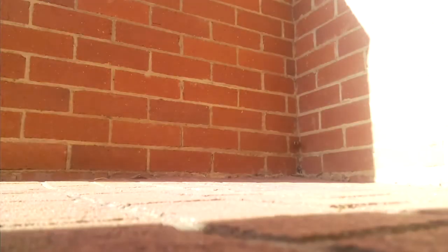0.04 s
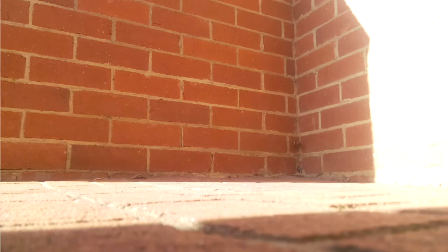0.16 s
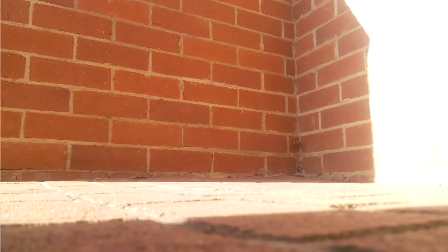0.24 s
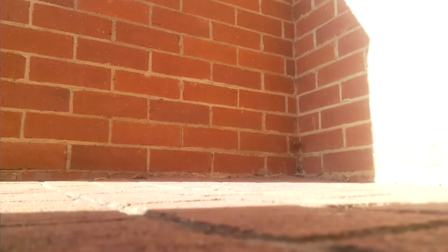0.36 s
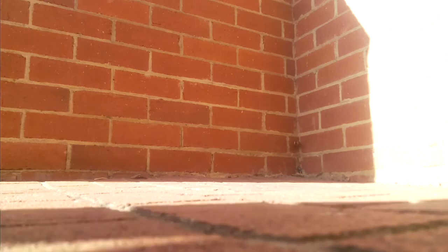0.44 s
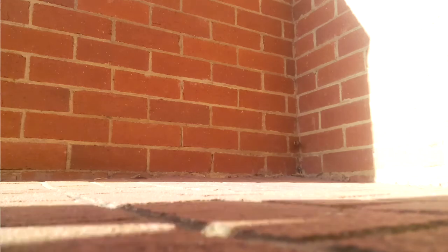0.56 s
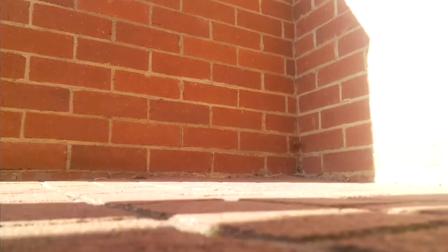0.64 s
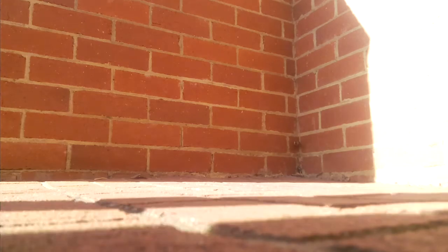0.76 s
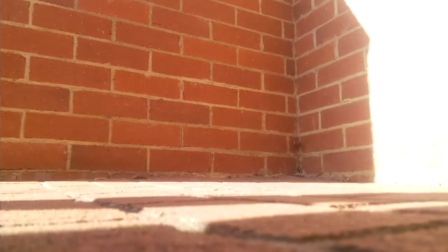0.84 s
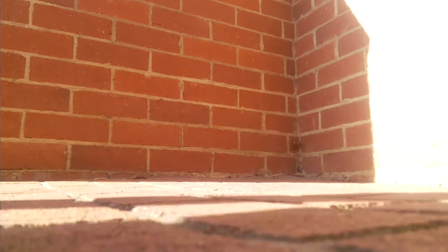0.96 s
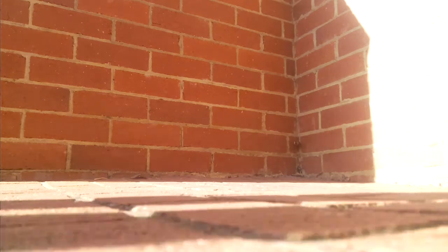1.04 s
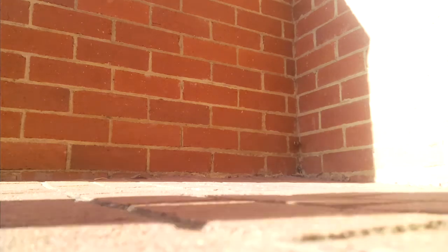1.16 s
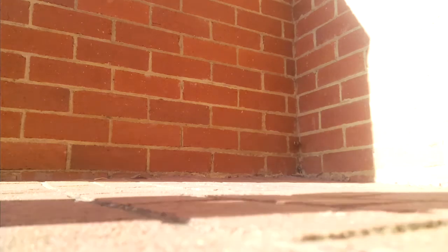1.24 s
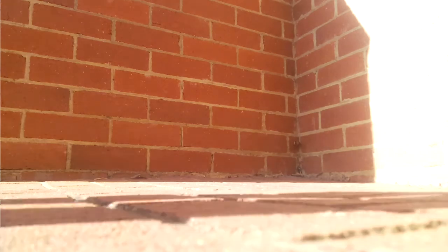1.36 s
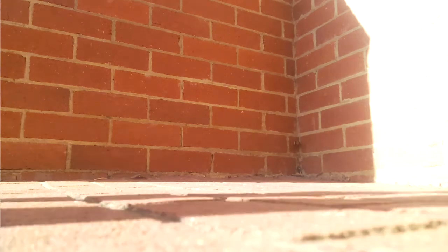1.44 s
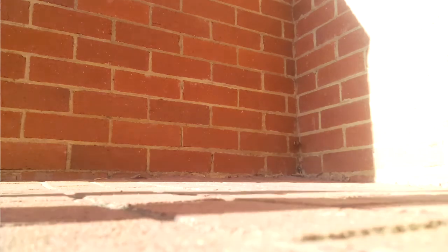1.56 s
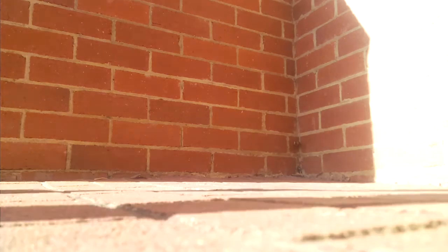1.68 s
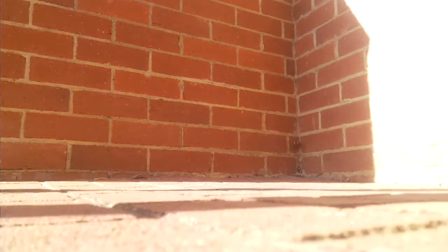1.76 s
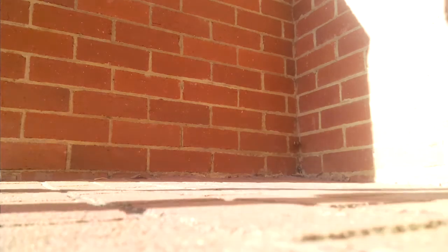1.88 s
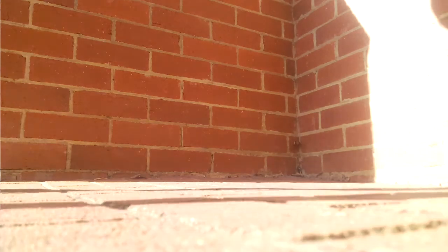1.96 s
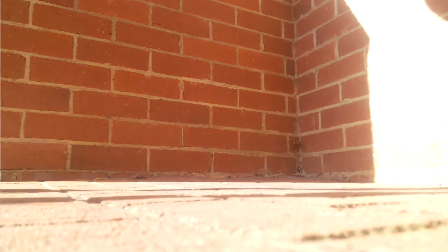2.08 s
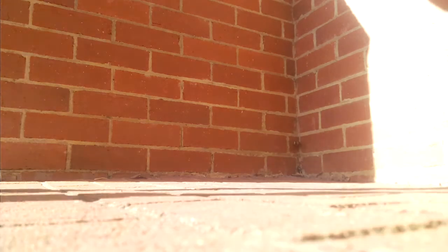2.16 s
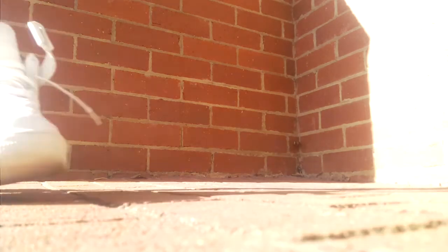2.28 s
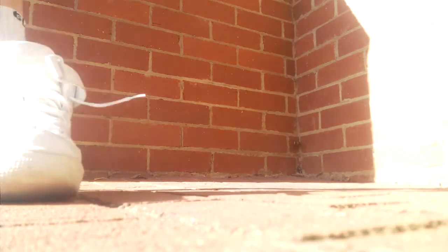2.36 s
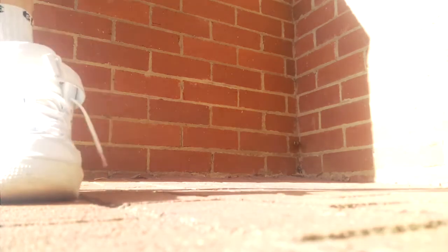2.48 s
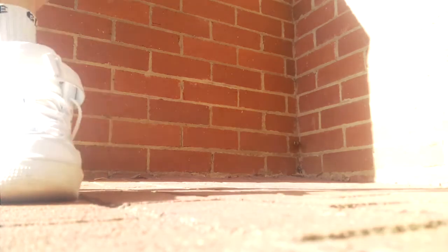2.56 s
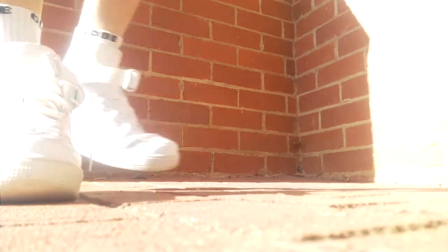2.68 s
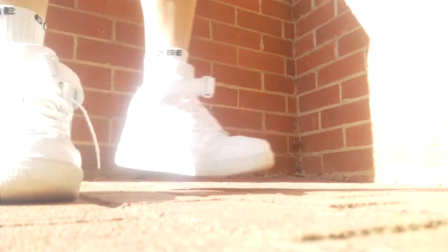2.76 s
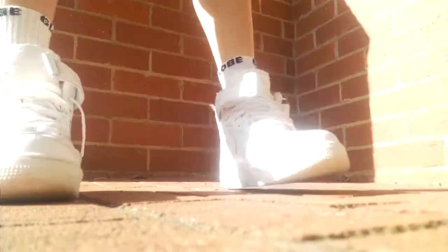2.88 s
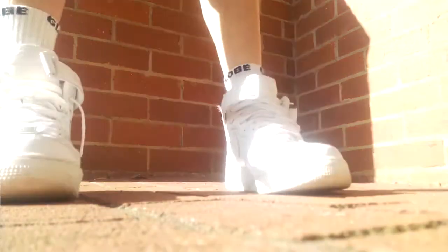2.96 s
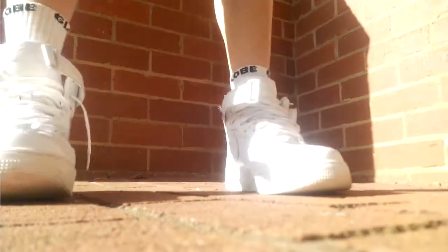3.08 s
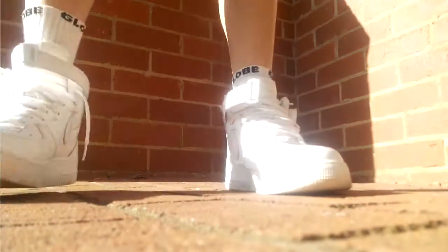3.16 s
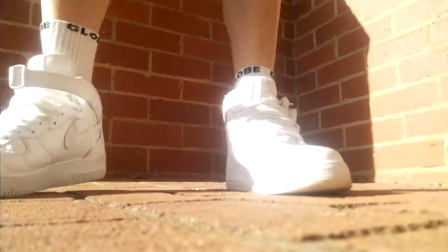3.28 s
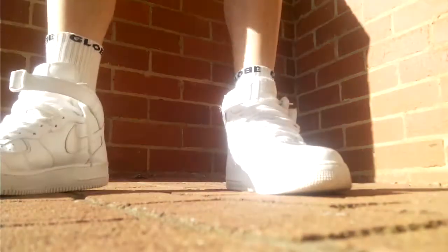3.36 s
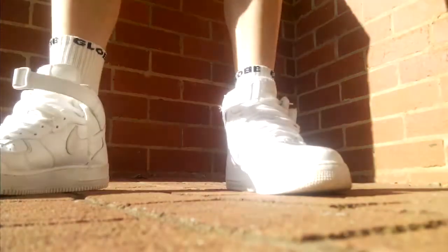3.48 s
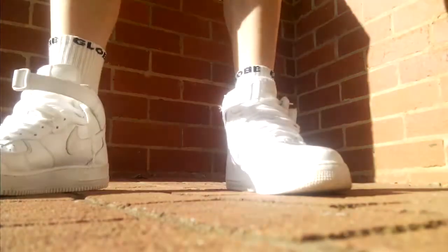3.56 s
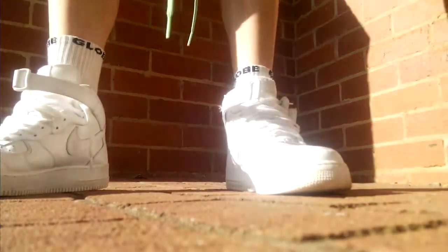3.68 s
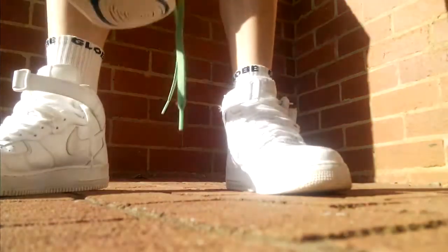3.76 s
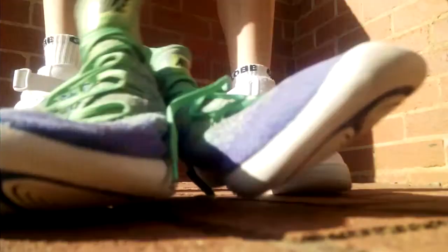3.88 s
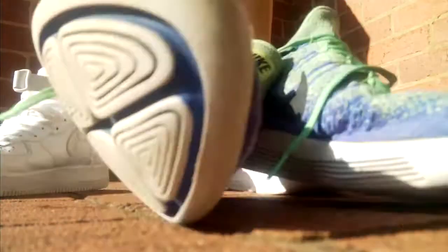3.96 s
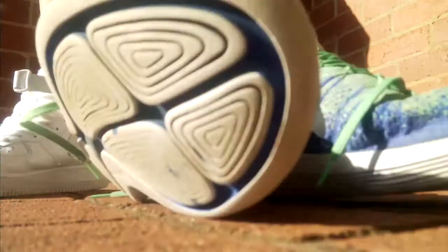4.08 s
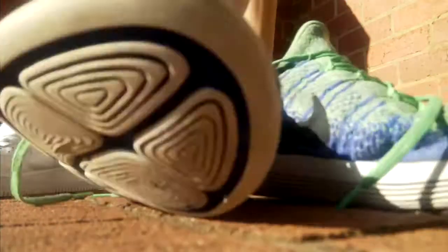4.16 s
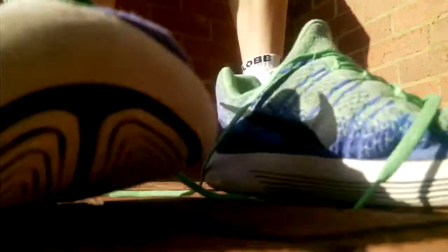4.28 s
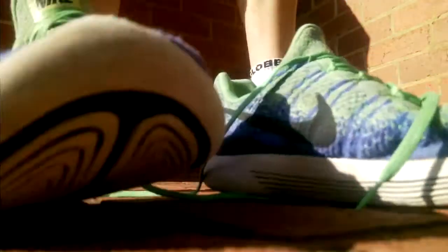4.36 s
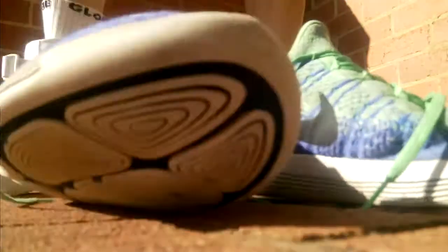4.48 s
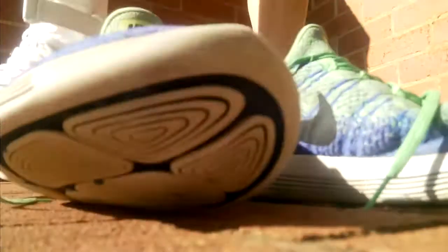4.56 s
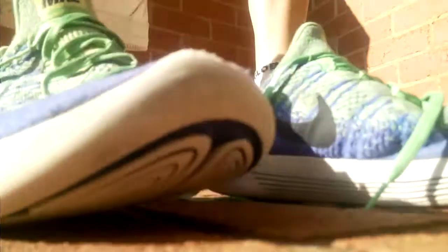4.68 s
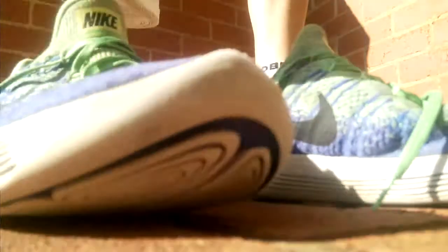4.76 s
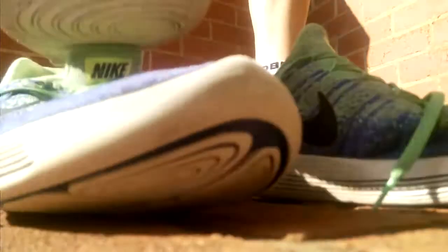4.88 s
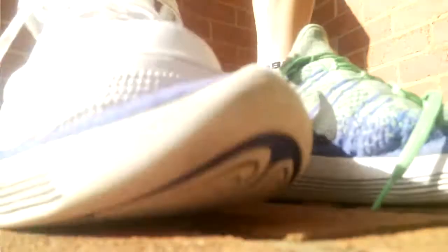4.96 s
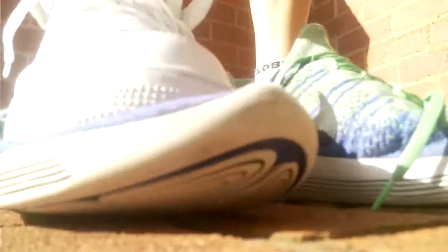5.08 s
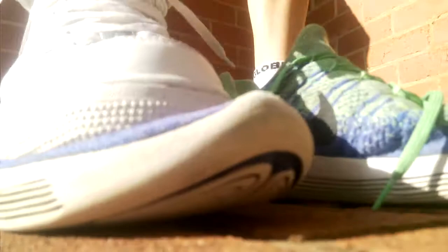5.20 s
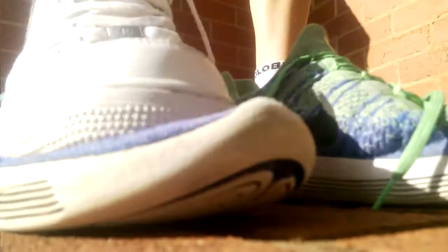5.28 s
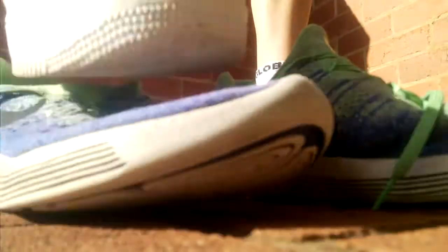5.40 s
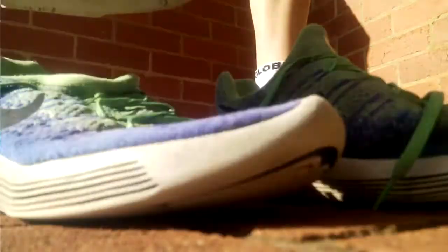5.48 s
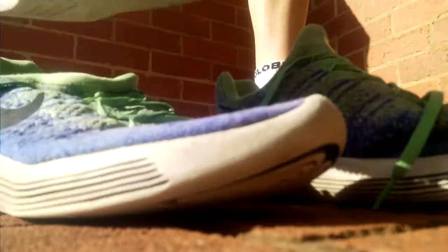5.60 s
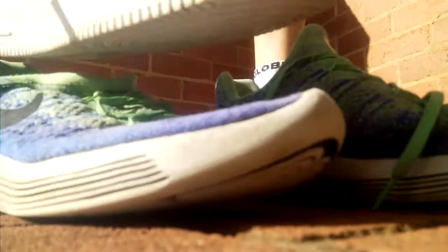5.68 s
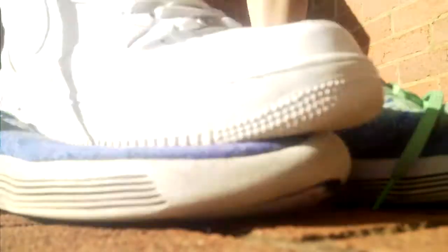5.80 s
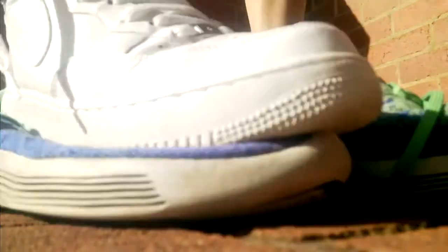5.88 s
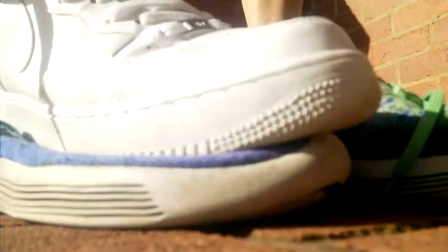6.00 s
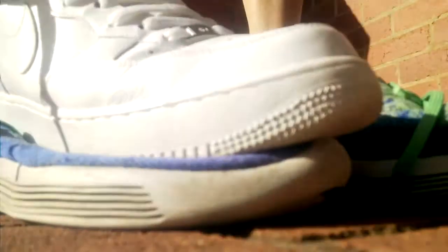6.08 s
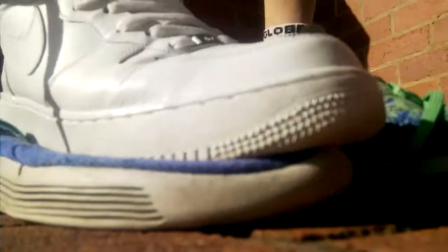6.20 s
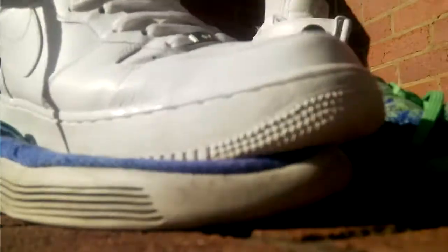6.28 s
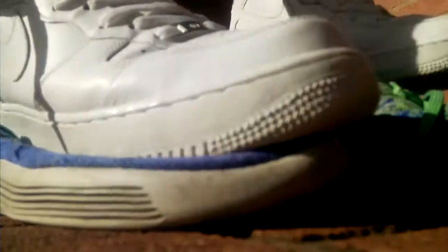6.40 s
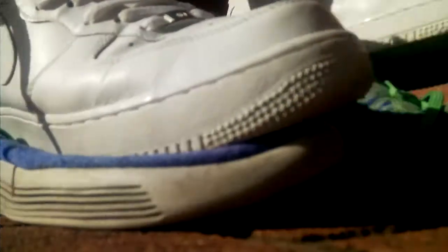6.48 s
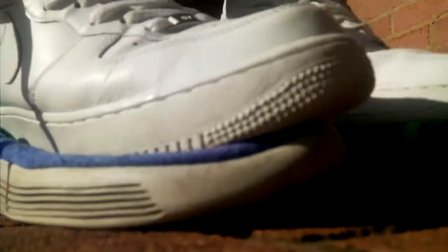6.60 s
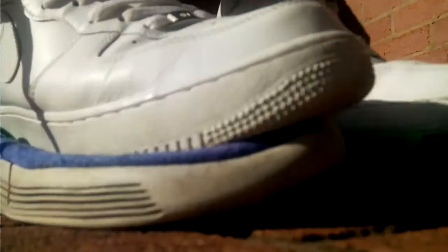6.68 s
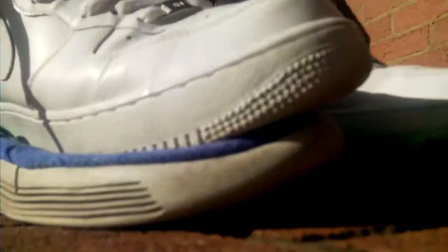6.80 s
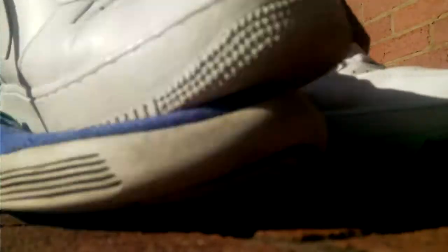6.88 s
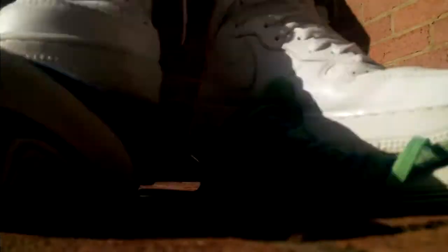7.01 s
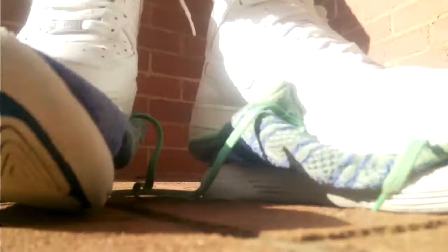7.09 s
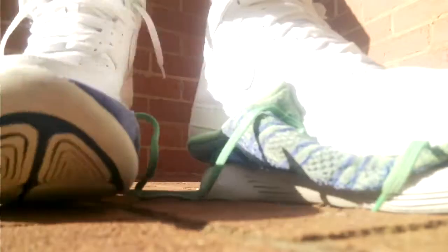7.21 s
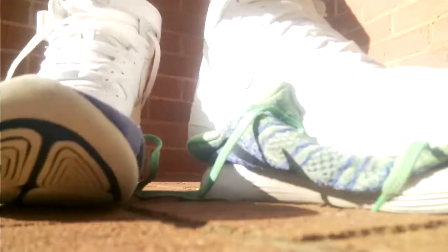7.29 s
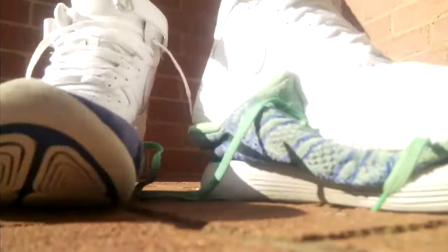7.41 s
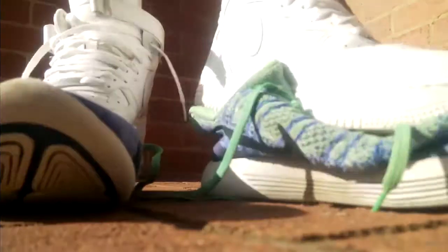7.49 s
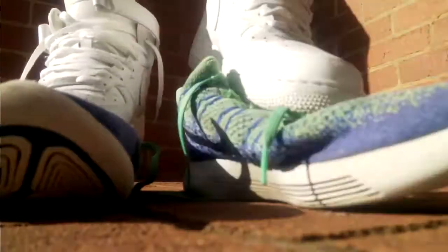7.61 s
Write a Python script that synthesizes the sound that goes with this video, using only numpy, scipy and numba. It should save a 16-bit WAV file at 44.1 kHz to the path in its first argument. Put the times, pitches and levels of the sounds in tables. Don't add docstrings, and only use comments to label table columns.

```python
import sys
import numpy as np
from scipy import signal
from scipy.fft import rfft, irfft
from scipy.io import wavfile
from scipy.ndimage import uniform_filter1d
from numba import njit

SR = 44100
rng = np.random.default_rng(int(sys.argv[2]) if len(sys.argv) > 2 else 0)


def wrap_up_sound(samples):
    columns = np.atleast_2d(samples).T
    tamed = np.clip(columns, -1, 1)
    steps = np.round(tamed * 32767).astype(np.int16)
    wavfile.write(sys.argv[1], SR, steps)


def amplitude_ratio(level_db):
    exponent = np.asarray(level_db, float) / 20
    return 10 ** exponent


N = 337365
DROP_S = 4.0


def curve(rows):
    s, *columns = np.transpose(rows)
    return [np.interp(np.arange(N) / SR, s, c) for c in columns]


def on_log(rows, hz):
    table = np.array(rows)
    return np.interp(np.log(hz), np.log(table[:, 0]), table[:, 1])


def unit(x):
    return x / np.sqrt(np.mean(x ** 2))


def peak(x):
    return x / np.abs(x).max()


@njit
def svf(x, hz, width):
    y, b, l, g = np.empty(len(x)), 0., 0., 0.
    for i in range(len(x)):
        if i == 0 or hz[i] != hz[i - 1]:
            g = np.tan(np.pi * hz[i] / SR)
        k = width[i] / hz[i]
        v = (b + g * (x[i] - l)) / (1 + g * (g + k))
        b, l, y[i] = 2 * v - b, l + 2 * g * v, k * v
    return y


def band(x, hz, width):
    return svf(x, np.clip(hz + np.zeros(len(x)), 10, SR / 3), width + np.zeros(len(x)))


def walk(rate):
    k = int(SR / rate)
    held = np.repeat(rng.standard_normal(N // k + 1), k)
    return unit(uniform_filter1d(uniform_filter1d(held, k), k)[:N])


def add(out, s, sound, pan_db):
    i = int(s * SR)
    n = min(sound.shape[-1], N - i)
    out[:, i:i + n] += sound[..., :n] * amplitude_ratio(np.array([[pan_db], [-pan_db]]) / 2)


# t/s, peak level/dB, thud
# f/Hz, sole knock level/dB, knock f/Hz
LIGHT_STEPS = [(.672, -28.5, 231, -16, 425), (1.3684, -24, 155, -4.5, 398), (1.998, -19, 129.4, -16.5, 497),
               (4.573, -30.5, 189.6, 2, 775), (6.806, -33.5, 141, 0, 615), (2.018, -29, 150, -5, 600),
               (2.039, -29, 141, -10, 600), (2.538, -19, 131.7, -14.5, 309), (2.58, -18, 185, -12.5, 518),
               (3.146, -17, 121, -4, 290), (3.154, -29.5, 256, -6.5, 607), (3.331, -31, 158, -4.5, 1170),
               (3.515, -30, 177, -27, 500), (4.095, -19.5, 374, -11, 500), (4.1235, -14.5, 397, -10, 500),
               (4.184, -12.5, 172, -6, 950), (4.286, -17.5, 100.6, -20, 800), (4.568, -23, 183, -2.5, 700),
               (4.871, -30.5, 159.6, -8.5, 500), (4.982, -32, 138, -17, 500), (5.1745, -19, 292, -10, 518),
               (5.186, -14.5, 90, -19, 498), (5.952, -28, 149, -19, 500), (6.7914, -17, 100.3, -11.5, 540),
               (6.835, -29.5, 108, -10, 523), (6.861, -27, 129.4, -11, 600)]
# t/s, peak level/dB, thud f/Hz, sole
# knock level/dB, contact/s
STAMPS = [(4.092, -12, 143.4, -9, 0.0031), (4.103, -9.5, 160.5, -20, 0.0015), (4.12, -1.5, 91, -7, 0.0031),
          (4.135, -16.5, 96.7, -35, 0.00087), (4.2, -13.5, 79, -11.5, .0028),
          (4.261, -22, 82.6, -10.5, 0.0039), (4.455, -25, 72.7, -19, 0.0018),
          (5.1543, 6.5, 117.7, -21, 0.005), (5.194, -23.5, 91, -26, 0.0047),
          (5.996, -23, 86.5, -39, 0.0033), (6.0085, -15.5, 84.6, -30, 0.001), (6.023, -32, 97, -31, 0.0048),
          (7.389, -32, 71, -1, 0.0014), (7.453, -27, 80, -9, 0.0012)]
AIR_SHOVES = [
    (5.137, -17.5, 103, -17, .003),
    (5.9857, -7, 118, -17.5, 0.0006),
    (6.003, -21, 68.8, -29, .003),
    (7.47, -32.5, 91, -18, 0.0023),
    (7.493, -32.5, 83, -20, .003),
]
STEP_RING_TURNS, STEP_CONTACT_TURNS = 4.95, 0.39
STAMP_RING_TURNS, STAMP_DAMP_PER_DB, STAMP_KNOCK_HZ = 3.14, 0.15, 700


def thuds():
    out, t = np.zeros((2, N)), np.arange(8192) / SR
    rows = [(s, db, hz, knock_db, STEP_CONTACT_TURNS / hz, STEP_RING_TURNS / hz, knock_hz, -1)
            for s, db, hz, knock_db, knock_hz in LIGHT_STEPS]
    for table, way in ((STAMPS, -1), (AIR_SHOVES, 1)):
        for s, db, hz, knock_db, contact in table:
            t60 = (STAMP_RING_TURNS - STAMP_DAMP_PER_DB * db) / hz
            rows.append((s, db, hz, knock_db, contact, t60, STAMP_KNOCK_HZ, way))
    chance = rng.standard_normal((2, N + len(t)))
    for s, db, hz, knock_db, contact, t60, knock_hz, way in rows:
        turn = hz * (t + 0.74 * 0.0033 * (1 - np.exp(-t / 0.0023)))
        onset = 1 - np.exp(-(t / max(contact, .0003)) ** 2)
        decay = np.exp(-np.log(1000) * t / max(t60, .01))
        swing = way * np.sin(2 * np.pi * turn) * onset * decay

        noise = chance[:, int(s * SR):int(s * SR) + len(t)]
        push = noise[0] * (np.exp(-t / 0.003) + 0.1 * np.exp(-t / 0.03)) * (1 - np.exp(-t / 0.0004))
        push = peak(push) + 1.5 * np.exp(-(t * knock_hz / .16 - 2) ** 2)
        knock = band(band(push, knock_hz, 0.49 * knock_hz), knock_hz, 0.68 * knock_hz)
        knock = way * peak(knock + 0.34 * band(band(push, 530, 460), 540, 760))

        shudder = band(band(noise[1] * t * np.exp(-t / 0.016), 188, 130), 100, 160)
        thud = peak(swing) + amplitude_ratio(knock_db) * knock + 0.085 * peak(shudder)
        add(out, s + 0.00125, amplitude_ratio(db) * thud, -.6)
    return out


# t/s, peak level/dB, ring f/Hz, body level/dB, sandy tail level/dB
CLATTER = [(4.0905, -1.5, 2560, -12, -13.5), (4.0934, -8.5, 3190, -23, -12.5),
           (4.0953, -15, 2310, -8.5, -14.5), (4.0991, -15, 3000, -12, -12), (4.1223, -12, 1600, 4, -9.5),
           (4.1244, -22, 1050, -10, -14), (4.1279, -9, 4200, -28, -13), (4.1593, -27.5, 2690, -2, -15.5),
           (4.1704, -35, 5200, -11, -9.5), (4.184, -20, 1600, 1, -4.5), (4.1872, -22, 4820, -8, -7.5),
           (4.219, -35, 4500, -20, -8.5), (4.2227, -16, 3550, -17.5, -12.5),
           (4.2815, -38.5, 3420, -4, -11.5), (4.2925, -26.5, 2300, -10.5, -15.5)]
CLICKS = [(0.675, -45, 1960, -11, 10), (1.3728, -38, 5470, -14, -4), (1.378, -34.5, 3200, -19, -4),
          (1.9998, -28.5, 1560, -3, -22.5), (2.2078, -43, 2500, -26, 5.5), (2.5067, -23, 3980, -11, -10.5),
          (2.5385, -35.5, 2480, -7, -11), (3.1486, -25.5, 3030, -6.5, -8.5),
          (3.3304, -31.5, 5750, -1.5, -8), (3.564, -24.5, 4120, -25, -16), (3.567, -25, 4860, -27, -15),
          (3.6828, -21.5, 3870, -21, -12), (4.5937, -37.5, 1830, -4.5, -19), (5.1574, -19, 3950, 3.5, -8),
          (5.173, -26, 3980, -0.5, -5.5), (5.3632, -26.5, 3000, -15, -19.5), (5.9869, -27, 2750, -5, -31),
          (5.999, -32, 2620, -15.5, -7), (6.5218, -29.5, 2680, -8, -11.5), (6.6849, -28, 2450, -6.5, -10.5),
          (6.791, -31.5, 1600, -1, -20)]
# t/s, peak level/dB, ring f/Hz, body level/dB
CATCHES = [(7.076, -34, 3570, -19.5), (7.0878, -24.5, 4450, -28), (7.0935, -36, 4300, -25),
           (7.1257, -21, 2200, -18), (7.1393, -29, 2150, -20), (7.152, -28, 4400, -20),
           (7.1776, -29, 2880, -20), (7.218, -38, 3350, -15), (7.2424, -32, 2290, -17),
           (7.2561, -30, 4800, -3), (7.283, -29, 3900, -4), (7.3153, -21, 3630, -25),
           (7.3237, -21, 3000, -25), (7.3248, -17.5, 3500, -26), (7.3318, -16.5, 3500, -28),
           (7.3348, -21.5, 3320, -25), (7.3887, -25, 2520, -3.5)]
# t/s, peak level/dB, ring f/Hz
GRAINS = [(0.8444, -46, 4100), (.862, -43, 5700), (.927, -39, 5600), (0.9599, -37.5, 3600),
          (1.954, -45, 2500), (1.972, -47, 2400), (2.06, -44, 4300), (2.073, -42.5, 2600),
          (2.139, -39.5, 3900), (6.815, -44, 1900), (2.581, -39, 3520), (2.6057, -37, 2700),
          (2.7252, -44, 2290), (2.7776, -43, 2450), (3.301, -42.5, 2440), (3.5384, -40.5, 3660),
          (3.5488, -40.5, 4000), (4.0406, -39.5, 4100), (4.046, -38.5, 4560), (4.0632, -37, 3540),
          (4.3896, -36.5, 3340), (4.4585, -44, 2200), (4.4743, -35, 2300), (4.636, -41, 2170),
          (4.873, -40, 1740), (5.0996, -37.5, 3530), (5.1062, -40.5, 4230), (5.225, -38, 3500),
          (6.063, -41.5, 3600), (6.077, -41, 2700), (5.709, -44, 4300), (5.741, -42.5, 3470),
          (6.562, -45, 4130), (6.5922, -44, 3700), (6.6458, -48.5, 2560), (6.669, -43, 2180),
          (7.5904, -39.5, 3130), (7.6414, -39, 2580)]
GRAIN_BODY_DB, GRAIN_TAIL_DB, GRAIN_EDGE_DB = -17, -10.5, -6
CATCH_TAIL_DB, CATCH_EDGE_DB = -19.5, -16
CLICK_EDGE_DB, CLATTER_EDGE_DB = -24, -12.5
LINGER, CLATTER_LINGER = .2, 0.094
CHATTER_S = .0007
WALL_FAR_S, WALL_FAR_DB, WALL_NEAR_S, WALL_NEAR_DB = 0.00071, -8.5, 0.000901, -8


def ticks():
    out, t = np.zeros((2, N)), np.arange(4096) / SR
    rows = [(*r, GRAIN_BODY_DB, GRAIN_TAIL_DB, GRAIN_EDGE_DB, LINGER) for r in GRAINS]
    rows += [(*r, CLICK_EDGE_DB, LINGER) for r in CLICKS]
    rows += [(*r, CLATTER_EDGE_DB, CLATTER_LINGER) for r in CLATTER]
    rows += [(*r, CATCH_TAIL_DB, CATCH_EDGE_DB, LINGER) for r in CATCHES]
    sand = rng.standard_normal((3, N + len(t)))
    for s, db, hz, body_db, tail_db, edge_db, linger in rows:
        wall_s, wall_db = (WALL_FAR_S, WALL_FAR_DB) if s < DROP_S else (WALL_NEAR_S, WALL_NEAR_DB)
        noise = sand[:, int(s * SR):int(s * SR) + len(t)]
        chatter = noise[0] ** 3 * (t / CHATTER_S) * np.exp(-t / CHATTER_S)
        strike = (t == 0) + .45 * peak(chatter)
        strike = strike + amplitude_ratio(wall_db) * np.roll(strike, int(wall_s * SR))

        ring = peak(band(band(strike, hz, 0.5 * hz), hz, 0.66 * hz))
        edge = amplitude_ratio(edge_db) * peak(band(band(strike, 4500, 2400), 4500, 3600))
        body = amplitude_ratio(body_db) * peak(band(band(strike, 990, 610), 940, 620))

        left_right = noise[1] + .5 * np.array([noise[2], -noise[2]])
        tail = np.array([unit(band(band(v, 1500 + 0.3 * hz, 4900), 1500 + 0.35 * hz, 5900)) for v in left_right])
        tail = tail * (np.exp(-t / 0.0023) + linger * np.exp(-t / 0.027))
        add(out, s - .0002, amplitude_ratio(db) * (ring + edge + body + amplitude_ratio(tail_db) * tail), 0)
    return out


# t/s, length/s, grit level/dB, sole rub against it level/dB
SLIDES = [(0.01, 0.013, -45.5, -19), (0.852, 0.053, -50, -7), (.913, 0.035, -42, -12),
          (1.371, 0.055, -44, -5), (2.013, 0.097, -54, 7.5), (3.146, 0.048, -61, 10.5),
          (4.147, 0.045, -50, 2), (4.186, .03, -43.5, 7), (4.238, 0.022, -43, -6.5),
          (4.264, .025, -46, 0.5), (5.154, 0.051, -40, -9), (5.233, 0.11, -52.5, 0), (5.995, 0.02, -49, 0),
          (7.539, 0.12, -53.5, -3.5)]
# t/s of most pressure, length/s, grit level/dB, rub against it level/dB
DRAGS = [(.33, 0.44, -61, -18), (1.39, .02, -45.5, -3.5), (1.411, 0.026, -55.5, 1),
         (1.506, 0.11, -57.5, -1), (1.58, .08, -56, -9), (1.983, 0.12, -63, 10.5), (2.131, 0.065, -56, -13),
         (2.565, 0.22, -62.5, 9), (2.728, .14, -59.5, -0.5), (3.315, 0.037, -51, -1.5),
         (3.519, 0.016, -58, -3), (3.565, 0.027, -57, -1), (4.711, 0.29, -59, -2.5),
         (5.1425, 0.013, -38, -9), (5.442, 0.2, -58.5, -1), (5.565, 0.13, -50, -3.5),
         (5.645, 0.026, -61, -13), (5.966, .06, -59.5, 3), (6.056, 0.095, -54, 3),
         (6.802, 0.036, -58.5, -5), (6.843, .05, -59.5, 9.5), (6.87, .04, -56.5, 4),
         (7.324, 0.023, -28.5, -10.5), (7.471, 0.12, -50.5, 0.5), (7.645, 0.045, -58.5, -2)]
# t/s, grit level/dB
PUSHES = [
    [(7.073, -60), (7.079, -50), (7.099, -49), (7.12, -43.5), (7.135, -37.5), (7.156, -36), (7.163, -46.5)],
    [(7.17, -42.5), (7.181, -41), (7.195, -44.5), (7.201, -51.5), (7.215, -48.5), (7.231, -55)],
    [(7.238, -46.5), (7.26, -44), (7.285, -39.5), (7.304, -42.5), (7.345, -41), (7.362, -42), (7.38, -43),
     (7.402, -47.5), (7.415, -64)],
]
SLIDE_BITE_S, SLIDE_FALL_DB = 0.0028, 14
DRAG_EASE_DB, SCRAPE_RUB_DB = 15.5, -2


def pressure():
    out, since = np.zeros((2, N + SR)), np.arange(-SR // 2, SR // 2) / SR
    shapes = []
    for s, length, db, rub_db in SLIDES:
        bite = np.clip(1 + since / SLIDE_BITE_S, 0, 1)
        fall = amplitude_ratio(-SLIDE_FALL_DB * np.abs(since) / length)
        shapes.append((s, db, rub_db, bite * fall * (since < 2 * length)))
    for s, length, db, rub_db in DRAGS:
        swell = amplitude_ratio(-DRAG_EASE_DB * np.clip(2 * since / length, -10, 10) ** 2)
        shapes.append((s, db, rub_db, swell))
    for s, db, rub_db, shape in shapes:
        i = min(int(s * SR), N)
        out[:, i:i + SR] += amplitude_ratio(db + np.array([[0], [rub_db]])) * shape

    t = np.arange(N) / SR
    scrape = np.concatenate(PUSHES)
    down = (t > scrape[0, 0]) & (t < scrape[-1, 0])
    scrape_gain = down * amplitude_ratio(curve(scrape)[0]) * amplitude_ratio(np.array([[0], [SCRAPE_RUB_DB]]))
    return out[:, SR // 2:SR // 2 + N] + scrape_gain


PATCHY_DB = 3.5
SHOE_BEND = .07


def hollow(slip, hz, width, db):
    patch = walk(25)
    bent_hz = hz * (1 + SHOE_BEND * patch[::-1])
    return amplitude_ratio(db + PATCHY_DB * patch) * unit(band(band(slip, bent_hz, width), bent_hz, 2 * width))


# f/Hz, width/Hz, level/dB
SHOE = [(900, 900, 0.5), (2220, 1400, 3), (2820, 780, -3.5), (3500, 960, 1), (4770, 1200, -2),
        (5660, 1400, -5)]
# t/s, f/Hz
GRIT_HZ = [(0, 4480), (1.5, 4210), (2.1, 2980), (4.2, 3490), (5.5, 3290), (6.85, 2370), (7.08, 4150),
           (7.13, 2490), (7.2, 2890), (7.33, 3660), (7.65, 3670)]
FAR_SHOE_SHARE = 0.52
SCUFF_WALL_S, SCUFF_WALL_DB = .00085, -9


def scuff():
    grit_gain, rub_gain = uniform_filter1d(pressure(), size=160)
    size_db = 2.4 * np.minimum(rng.exponential(size=N), 4)
    grains = rng.standard_normal(N) * amplitude_ratio(size_db) * (rng.random(N) < .25)
    slip = grains * amplitude_ratio(1.2 * walk(45) + 1.6 * walk(220))
    slip = slip + amplitude_ratio(SCUFF_WALL_DB) * np.roll(slip, int(SCUFF_WALL_S * SR))

    centre_hz = curve(GRIT_HZ)[0]
    shoe = unit(sum(hollow(slip, *row) for row in SHOE[1:]))
    shoe_share = np.where(np.arange(N) < DROP_S * SR, FAR_SHOE_SHARE, 1)
    sand = unit(band(band(slip, centre_hz, 3900), centre_hz, 4000))
    grit = unit(0.91 * shoe * shoe_share + sand)

    sole_hz, sole_width, sole_db = SHOE[0]
    rub = unit(unit(band(slip, sole_hz, sole_width)) * amplitude_ratio(sole_db) + unit(band(slip, 460, 350)))
    return (grit_gain * grit + rub_gain * rub) * np.ones((2, 1))


# f/Hz, side against mid level/dB
PORTS = [(60, -17), (200, -20), (330, -4.5), (500, -2.5), (900, -6), (2300, -8), (3500, -3.5), (4600, 1),
         (6500, 5), (8000, 8)]


def ports(x):
    hz = np.maximum(np.arange(N // 2 + 1) * SR / N, 1)
    knots = rng.standard_normal(160)
    wander = np.cumsum(np.interp(hz, 200 * np.arange(len(knots)), knots)) * SR / N
    comb = 1.42 * np.cos(0.0011 * 2 * np.pi * wander)
    side = irfft(rfft(x.mean(axis=0)) * amplitude_ratio(on_log(PORTS, hz)) * comb * -1j, N)
    side = side * np.tanh(9 * walk(22))
    return x + np.array([side, -side])


# f/Hz, level/dB per Hz
TOWN = [(12, -45), (20, -17.5), (59, -5), (151, -4), (176, 5), (194, -16), (263, -11.5), (415, -28),
        (688, -26), (821, -28.5), (908, -32.5), (2090, -37), (4350, -35), (7210, -44.5), (8390, -52.5),
        (10900, -93), (18500, -120)]
# t/s, level/dB
RUMBLE = [(0, -41.5), (2.8, -42.5), (3.94, -43), (4.25, -40.5), (4.7, -40.5), (4.94, -42.5), (7.2, -41),
          (7.3, -37.5), (7.65, -42.5)]
TOWN_DB = -41.5


def town():
    out, swell = 0, curve(RUMBLE)[0]
    swell = swell - swell.mean()
    for hz in 25 * 2 ** np.arange(0, 8.4, 1 / 3):
        mid, side = (unit(band(band(rng.standard_normal(N), hz, hz / 3), hz, hz / 3)) for _ in range(2))
        db = on_log(TOWN, hz) + 10 * np.log10(hz)
        db = db + min(300 / hz, 1) * swell + 0.77 * walk(6.7)
        wide = amplitude_ratio(on_log(PORTS, hz) + 1.0) * side * np.array([[1], [-1]])
        out = out + amplitude_ratio(db) * (mid + wide)
    return amplitude_ratio(TOWN_DB) * unit(out)


def dull(x, hz):
    return ports(signal.sosfilt(signal.butter(6, hz, fs=SR, output="sos"), x))


# t/s, left over right level/dB
FEET_PAN = [(0.0, 4), (0.13, 4), (0.83, 2.5), (0.94, 8), (1.04, 3.5), (3.98, 1.0), (4.13, -0.5),
            (4.94, 2.0), (6.73, 1.5), (6.8, -2.5), (6.92, 1), (7.65, 2.5)]


def scene():
    pan_db = curve(FEET_PAN)[0]
    feet = dull(ticks(), hz=7150) + dull(scuff(), hz=6040)
    feet = feet * amplitude_ratio(np.array([pan_db, -pan_db]) / 2)
    return feet + dull(thuds(), hz=6500) + town()


def band_limit(x):
    return signal.sosfilt(signal.butter(12, 8540, fs=SR, output="sos"), x)


CAPSULE, TOP_HZ, FULL = 2.6, 7050, 1.


def record(dry):
    squeezed = CAPSULE * np.tanh(dry / CAPSULE)
    rolled_off = signal.sosfilt(signal.butter(8, TOP_HZ, fs=SR, output="sos"), squeezed)
    return band_limit(np.clip(rolled_off, -FULL, FULL))


dry = scene()
out = record(dry)
wrap_up_sound(out)
```